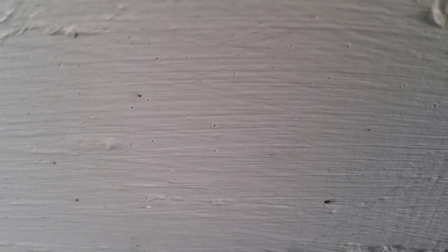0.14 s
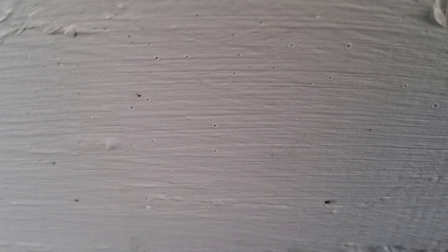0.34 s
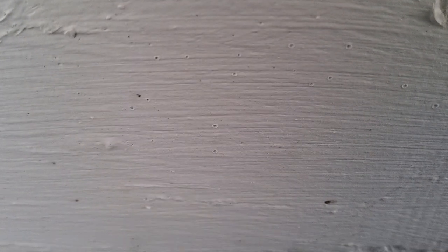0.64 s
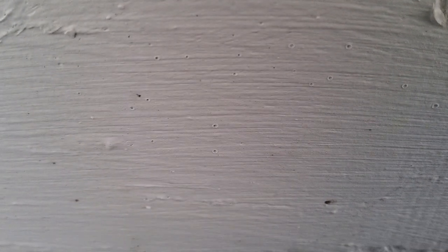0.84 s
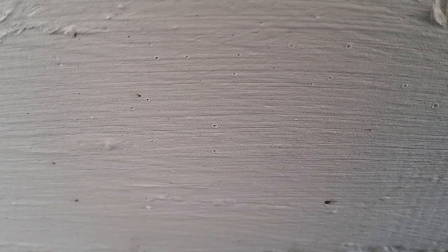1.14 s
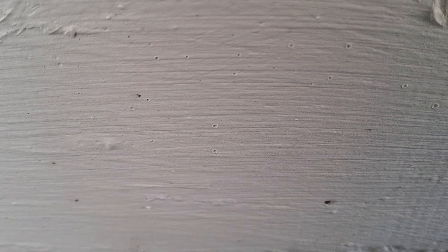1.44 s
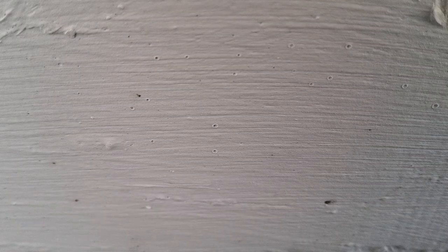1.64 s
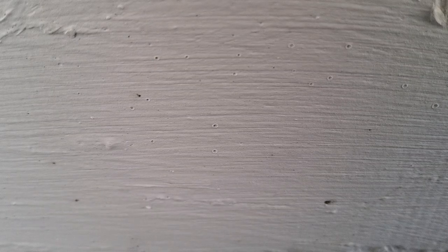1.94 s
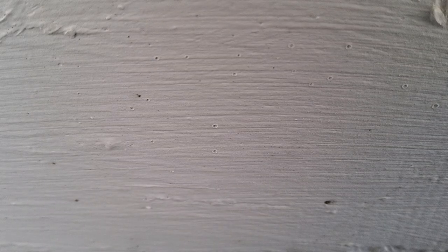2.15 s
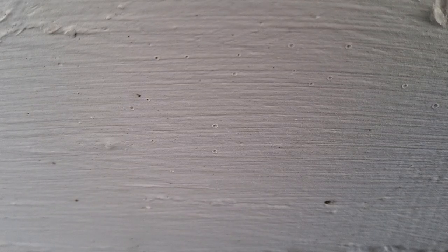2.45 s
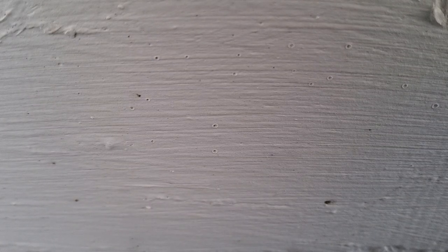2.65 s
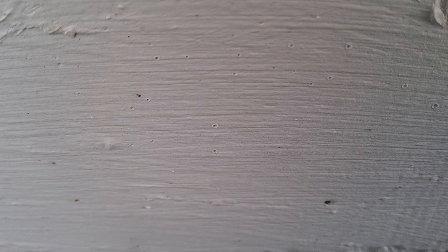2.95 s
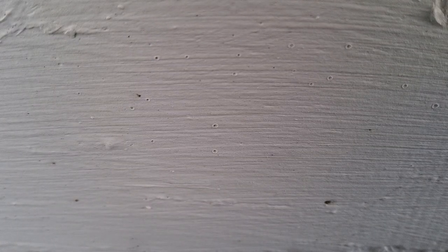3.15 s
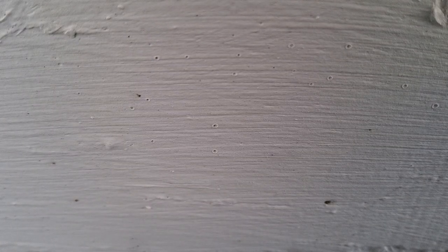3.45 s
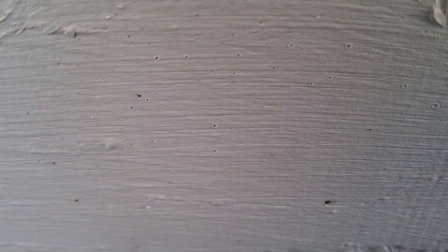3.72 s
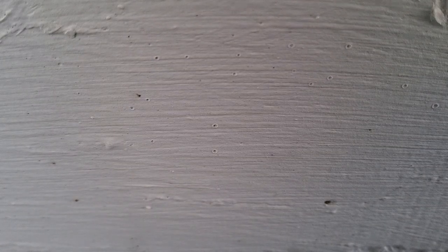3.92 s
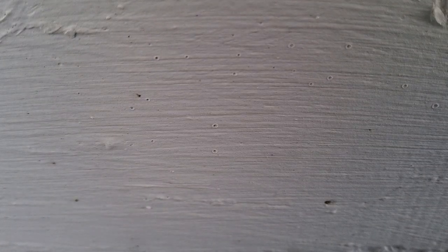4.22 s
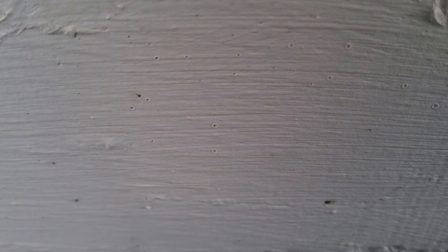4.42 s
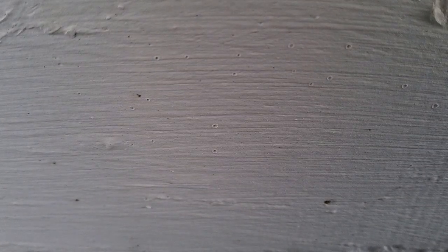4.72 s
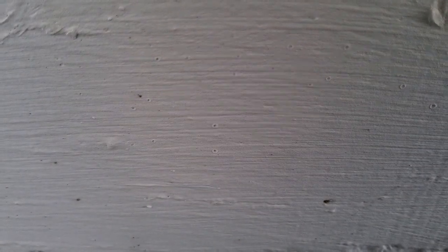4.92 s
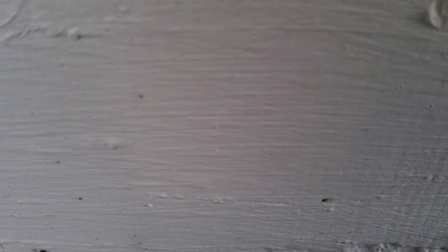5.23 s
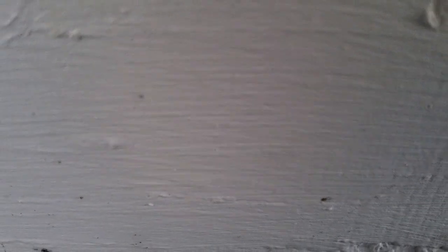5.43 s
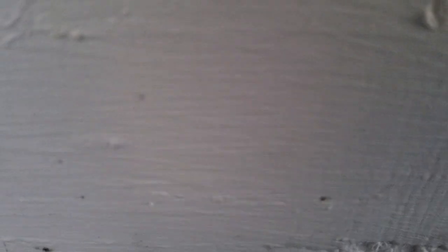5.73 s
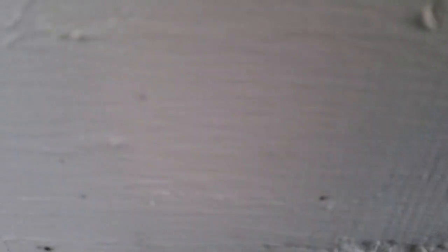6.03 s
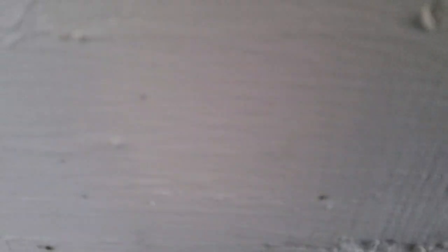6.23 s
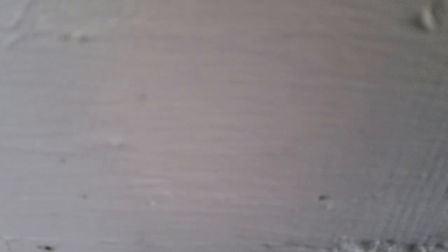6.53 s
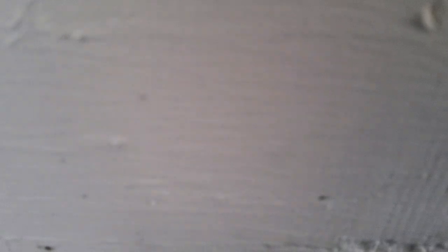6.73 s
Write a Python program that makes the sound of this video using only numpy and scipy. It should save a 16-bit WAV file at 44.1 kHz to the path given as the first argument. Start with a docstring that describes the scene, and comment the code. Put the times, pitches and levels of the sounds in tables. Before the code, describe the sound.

A small metal bell on a wooden mount is struck repeatedly, hard and soft, ringing with wavering beats and overloaded crackles, then fading amid light ticks.

```python
"""A small metal bell on a wooden mount, close to a two-microphone recorder, over a faint wavering rumble.
It is already ringing from a blow just before the start; further blows, hard and soft, follow up to 5.7 s.
Each blow feeds slightly mistuned twin modes that beat as they fade; hard ones overload the input and crackle.
Between and after the blows, until 6.4 s, light ticks ring the striker and knock the mount.
The input stage lifts the treble, clips it and lowers it again, which crunches the bass."""
import sys
import numpy as np
from scipy import signal
from scipy.fft import rfft, irfft
from scipy.io import wavfile
from scipy.ndimage import uniform_filter1d

SR = 44100
rng = np.random.default_rng(int(sys.argv[2]) if len(sys.argv) > 2 else 0)


def to_wav(sig):
    """Store sig (one row per channel, or 1-D mono) as 16-bit WAV at the path in sys.argv[1].

    Samples outside -1..1 are clipped; the rate is SR.
    """
    pcm = np.clip(np.atleast_2d(sig), -1, 1) * 32767
    pcm = np.round(pcm).astype(np.int16)
    wavfile.write(sys.argv[1], SR, pcm.T)  # frames by channels


N = 302967


def undb(db):
    """Decibels to gain."""
    return 10 ** (np.asarray(db) / 20)


def colour(x, points):
    """Shape the spectrum along (f/Hz, level/dB) points, then set the rms to 1."""
    hz, db = np.transpose(points)
    f = np.fft.rfftfreq(x.shape[-1], 1 / SR)
    gain = undb(np.interp(np.log(f + 1), np.log(hz), db))
    y = irfft(rfft(x) * gain, x.shape[-1])
    return y / np.sqrt(np.mean(y ** 2))


def wander(shape, size):
    """White noise averaged over a window of this many samples: a slow random drift."""
    return uniform_filter1d(rng.standard_normal(shape), size=size)


def add(out, s, sound):
    """Mix a sound in from time s, which may lie before the start."""
    i = int(s * SR)
    sound = sound[:, max(-i, 0):N - i]
    out[:, max(i, 0):max(i, 0) + sound.shape[1]] += sound


def rings(hz, t60, gain, length=1.2):
    """Sum of exponentially fading modes; gain is complex, channels x modes."""
    t = np.arange(int(length * SR)) / SR
    decay = np.log(1000) / t60
    return (gain @ np.exp(np.outer(2j * np.pi * hz - decay, t))).imag


# level of the background rumble: t/s, level/dB
RUMBLE_LEVEL = [(0.0, -67), (0.3, -67), (0.5, -50.5), (1.68, -65.5), (2.2, -61.5), (2.72, -58.5),
                (3.0, -71), (4.4, -68), (6.87, -63.5)]
# its spectrum: f/Hz, level/dB per Hz
RUMBLE_SPECTRUM = [(20, -25), (50, -5), (110, -10), (230, -12.5), (400, -29.5), (1000, -29), (4000, -43.5),
                   (16000, -54.5)]


def rumble():
    """Faint, mostly low noise, independent at each microphone, whose level wavers together in both."""
    s, db = np.transpose(RUMBLE_LEVEL)
    steps = np.repeat(rng.standard_normal(N // 3000 + 1), 3000)
    waver = uniform_filter1d(steps, size=3000)[:N]
    noise = colour(rng.standard_normal((2, N)), RUMBLE_SPECTRUM)
    microphone_db = np.array([[-1], [3]])  # left, right
    return noise * undb(np.interp(np.arange(N) / SR, s, db) + 1.3 * waver + microphone_db)


# spectrum of the spitting overload: f/Hz, level/dB per Hz
SPIT_SPECTRUM = [(30, -33), (90, -11), (230, 5), (800, -8), (2000, -1.5), (4000, -6), (8000, -14.5),
                 (16000, -39.5)]
# spectrum of the overload's bass: f/Hz, level/dB per Hz
THUMP_SPECTRUM = [(25, -38), (70, -1.5), (220, -2), (450, -13), (1500, -46)]
THUMP_DB, THUMP_LONGER = -5, 1.19  # bass level, and the factor by which it outlasts the spitting
LEFT_SHARE = .55  # length of the left crackle as a share of the right
SINK_DB, CHOKE_S = -5.5, 0.069  # the ring starts choked by SINK_DB; crackles shorter than CHOKE_S choke less


def crackle():
    """Overload: spitting noise with a sudden end, longer uneven bass, and the gain by which the ring sinks."""
    t = np.arange(N) / SR

    def gate(start, span):
        """Sudden start, then a steep fall around the end of the span."""
        past_end = (t - start - span) / (.06 * span)
        return (t >= start) / (1 + np.exp(np.clip(past_end, -40, 40)))

    loud, low, sink_db = np.zeros((3, 2, N))
    for start, *_, db, right_s in BLOWS:
        choke_db = SINK_DB * min(right_s / CHOKE_S, 1)
        for ear, length in enumerate((LEFT_SHARE * right_s, right_s)):
            done = np.clip((t - start) / length, 0, 1)
            loud[ear] += undb(db) * gate(start, length)
            low[ear] += undb(db) * gate(start, length * THUMP_LONGER)
            sink_db[ear] += choke_db * gate(start, length) * (1 - done)
    # the spitting flickers by about 5 dB, and all of the crackle more slowly by about 3 dB
    spit = rng.standard_normal((2, N)) * undb(3.6 * 11 * wander((2, N), 64))
    lumps = undb(3.0 * 22 * wander((2, N), 500))
    thump = colour(rng.standard_normal((2, N)), THUMP_SPECTRUM)
    thump = thump * uniform_filter1d(low, size=200) * undb(THUMP_DB)
    return lumps * (loud * colour(spit, SPIT_SPECTRUM) + thump), undb(sink_db)


# modes of the wooden mount: f/Hz, level/dB, t60/s
MOUNT_MODES = [(294, 0.5, 0.31), (337, -25.5, 0.5), (341, -17, 1), (440, -14.5, 0.39), (521, 5, 0.14),
               (710, -5.5, 0.05)]


def knock(db, chance):
    """The wooden mount thuds; the two microphones hear its modes differently."""
    hz, mode_db, t60 = np.transpose(MOUNT_MODES)
    ears = np.array([undb(-0.5) * np.exp(1.2j * chance[6:12]), np.ones(6)])
    gain = ears * undb(db + mode_db + 2.5 * chance[:6])
    thud = rings(hz * (1 + .02 * chance[34:]), t60, gain, .6)
    # the thud's level wavers at random, which roughens it
    thud = thud * (1 + .35 * 15 * wander(thud.shape, 225))
    # a soft push rather than a sharp one
    return thud * (1 - np.exp(-np.arange(thud.shape[1]) / SR / 0.0026))


# modes of the striker: f/Hz, level/dB, t60/s
STRIKER_MODES = [(4721, -19, 0.3), (5825, -6, 0.098), (7865, -17, 0.35), (8021, 0, 0.24), (8247, -15, 0.2),
                 (8845, -20, 0.18), (9808, -9, 0.16), (10460, -19, 0.22), (10690, -17, 0.19),
                 (10890, -15, 0.23), (11370, -19, 0.31), (11700, -24, 0.21), (12090, -18, 0.17),
                 (12440, -22, 0.29)]
# light contacts: t/s, striker level/dB, mount knock level/dB, rattle length/s
LIGHT_TICKS = [(.3262, -21, -37.5, .008), (.385, -36.5, -41.5, .004), (.719, -41, -55, .021),
               (.766, -43.5, -65, .025), (1.047, -62.5, -45, .005), (1.122, -60.5, -53, .004),
               (2.0105, -18, -36.5, 0.068), (2.372, -41, -40.5, .003), (2.618, -37, -52.5, .03),
               (2.735, -53, -49, .012), (2.803, -52.5, -55.5, .01), (2.914, -52, -67.5, .009),
               (3.382, -72, -60, .003), (3.6714, -29, -58, .036), (3.736, -40, -44.5, .02),
               (4.02, -47.5, -47.5, .006), (4.24, -36.5, -49, .03), (4.431, -60, -49.5, .003),
               (4.526, -61, -65, .004), (4.882, -46.5, -58, .01), (4.8913, -13.5, -44, .005),
               (5.1674, -38, -45, .003), (5.335, -37.5, -55.5, .004), (5.458, -62, -46, .003),
               (5.4874, -39.5, -51.5, .01), (5.633, -52, -42.5, .008), (5.763, -27.5, -51, .005),
               (6.168, -68, -55, .004), (6.4009, -38.5, -47, .008)]
TICK_LEFT_DB, HISS_DB, HISS_T60_S = -8.5, -6.5, .2  # left against right; the hiss of small modes
HARD_PER_DB, NEUTRAL_DB = 0.43, -46  # added dB per octave for each dB over the neutral strength
REBOUND_S, REBOUND_DB, REBOUND_RATTLE_S = .045, -16, 0.041  # chatter after each blow, against that blow's levels
HISS_SPECTRUM = [(500, -49.0), (1800, -9.5), (6000, 3.5),
                 (12000, -8.5), (14000, -23.0), (16000, -33.0)]  # f/Hz, level/dB


def ticks():
    """The striker chatters: its modes, a bright hiss of small modes, and a knock; stronger ticks are brighter."""
    hz, mode_db, t60 = np.transpose(STRIKER_MODES)
    left = undb(TICK_LEFT_DB) * np.exp(2j * np.pi * rng.random(len(hz)))
    ears = np.array([left, np.ones(len(hz))])
    t = np.arange(SR // 3) / SR
    out = np.zeros((2, N))
    rebounds = []
    for start, *_, quick_db, _, knock_db, _, _ in BLOWS:
        rebounds.append((start + REBOUND_S, quick_db + REBOUND_DB, knock_db + REBOUND_DB, REBOUND_RATTLE_S))
    for start, db, knock_db, rattle in LIGHT_TICKS + rebounds:
        hard = HARD_PER_DB * (db - NEUTRAL_DB)
        chance = rng.standard_normal(40)
        strength_db = mode_db + hard * np.log2(hz / 8000) + 4 * chance[12:12 + len(hz)]
        ring = rings(hz, t60, ears * undb(strength_db), 1 / 3)
        hiss = colour(rng.standard_normal((2, len(t))), HISS_SPECTRUM)
        # many small modes make its colour lumpy, and new at every contact
        hiss = colour(hiss, np.c_[np.geomspace(1500, 16000, 120), 8 * rng.standard_normal(120)])
        hiss_gain = undb(HISS_DB + np.array([[TICK_LEFT_DB], [0]]))
        hiss = hiss_gain * hiss * np.exp(-np.log(1000) * t / HISS_T60_S)
        # the hiss flickers by a few dB
        hiss = hiss * undb(2.5 * 20 * wander(len(t), 400))
        # a first contact, then sparse ones spread over the rattle
        touch = rng.standard_normal((1, len(t))) * (rng.random(len(t)) < .005) * (t < rattle)
        touch[0, 0] = 2.7
        touch = touch / np.sqrt(np.sum(touch ** 2))
        add(out, start, undb(db) * signal.fftconvolve(ring + hiss, touch, axes=1))
        add(out, start, knock(knock_db, chance))
    return out


# twin modes of the bell, each column pair for lower and upper twin: lower f/Hz, spacing/Hz, t60/s (two),
# left minus right level/dB (two), turns by which left leads (two)
BELL_TWINS = [(979.16, 1.69, 5.08, 5.38, -13.3, -2.9, -0.28, 0.01),
              (1921.77, 6.7, 0.86, 1.99, -11.9, -3.1, 0.08, -0.35),
              (2116.86, 2.23, 2.15, 2.46, -14.2, -15.3, 0.19, 0.23),
              (3276.4, 4.12, 0.86, 0.79, 0.7, -4.8, -0.45, -0.15),
              (4751.47, 1.39, 0.5, 0.64, -16.5, -10.8, 0.31, 0.37),
              (6440.95, 12.33, 0.49, 0.52, -13.6, -15.6, -0.43, -0.23),
              (4822.45, 11.67, 0.51, 0.46, 1.4, -6.3, -0.19, -0.09),
              (2883.92, 6.8, 0.75, 0.77, 3.9, -11.8, 0.05, 0.48),
              (4947.67, 1.01, 0.86, 0.53, -9.9, -11.3, -0.0, -0.27),
              (6137.61, 5.24, 0.31, 0.47, -10.1, -15.5, -0.25, -0.19),
              (8016.81, 4.06, 0.29, 0.31, -21.4, -14.8, 0.36, 0.2),
              (8322.09, 13.59, 0.39, 0.38, -34.6, -10.5, 0.41, 0.26),
              (10340.9, 7.88, 0.31, 0.33, -14.6, -10.7, -0.13, -0.33)]


def twin_modes():
    """Frequency, t60 and left and right pick-up of every twin, lower and upper side by side."""
    p = np.array(BELL_TWINS)
    hz = np.c_[p[:, 0], p[:, 0] + p[:, 1]]
    left = undb(p[:, 4:6]) * np.exp(2j * np.pi * p[:, 6:8])
    return hz, p[:, 2:4], np.array([left, np.ones_like(left)])


# strength of the quicker twin pairs, fifth to last: level/dB
QUICK_PAIR_DB = [1, 2, -7.5, -18.5, -15.5, -9.5, -16.5, -5.5, -3]
# unpaired treble modes of the bell: f/Hz, level/dB, t60/s
TREBLE_MODES = [(2480, -33.5, .38), (4290, -32, .5), (5500, -23, .3), (5850, -36, .64), (6837, -28, .45),
                (7386, -26.5, .24), (7865, -20.5, .41), (8650, -22, .3), (8899, -17, .18),
                (9860, -18.5, .1), (10005, -28, .23), (10890, -22, .28), (11300, -19, .28),
                (11440, -9, .087), (12540, -15, .28), (12870, -16.5, .13), (13210, -17, .13),
                (14200, -24, .25), (14620, -23, .22), (15590, -22, .2)]
# contacts on the rim: t/s, place/turns around the rim, long ring level/dB, its tilt/dB per octave,
# second pair's extra level/dB, earlier ring kept level/dB, quick ring level/dB, its hardness/dB per octave,
# mount knock level/dB, crackle level/dB, right crackle length/s
BLOWS = [(-.34997, .251, -11, 3.9, 2.2, 0, -22, -6, -45, -40, .05),
         (.46452, -.007, -9.6, 10, -4.6, 0, -5.5, 2.5, -25, -19, .085),
         (1.3289, .259, -29.5, -4.6, 1.7, -5.9, -48.5, -2, -35, -55, .008),
         (2.01006, .216, -53.4, -10.8, 32.4, 0, -60, .1, -45, -50, .04),
         (2.12128, .509, -4.9, 3.8, -10.1, 0, -5.5, 4.5, -26, -19.5, .091),
         (2.45418, .416, -15.3, 7.7, -4.1, -.5, -12.5, 2, -32.5, -18, .098),
         (3.67151, .513, -51.1, -16.7, 4.8, -7.5, -60, .1, -50, -55, .03),
         (3.83389, .508, -8.3, 4.2, -16, -1.2, -13, -13.5, -25, -22, .025),
         (4.09287, .555, -12.7, 4.1, -.2, 0, -8.5, 1.5, -31, -16.5, .1),
         (4.8929, .5, -60, 0, 0, 0, -55, 3, -40, -19, .016),
         (5.25486, .018, -17.8, 2.9, -3.2, 0, -24, 1.5, -27.5, -33.5, .02),
         (5.32446, -.102, -23.8, .3, -6.7, -2.8, -45.5, 9, -34, -38, .007),
         (5.74616, .039, -21.3, -6.2, 4.6, 0, -36, -15, -22, -33, .014)]
# the upper twins' share of a push swings twice around the rim: mean, swing, place of the peak/turns
UPPER_SHARE, UPPER_SWING, UPPER_PLACE = 0.53, .35, 0.017


def blows():
    """Each blow rings the quick pairs and the treble, tilted by its hardness, and knocks the mount."""
    hz, t60, ears = (v[..., 4:, :] for v in twin_modes())
    top_hz, top_db, top_t60 = np.transpose(TREBLE_MODES)
    top_left = undb(-12.0) * np.exp(2j * np.pi * rng.random(len(top_hz)))
    top_ears = np.array([top_left, np.ones(len(top_hz))])
    out = np.zeros((2, N))
    chances = rng.standard_normal((len(BLOWS), 40))
    for (start, place, *_, db, hard, knock_db, _, _), chance in zip(BLOWS, chances):
        swing = UPPER_SWING * np.cos(4 * np.pi * (place - UPPER_PLACE))
        angle = np.pi / 2 * np.clip(UPPER_SHARE + swing, 0, 1)
        share = np.array([np.cos(angle), np.sin(angle)])  # lower, upper
        pair_db = db + np.array(QUICK_PAIR_DB)[:, None] + hard * np.log2(hz / 5500)
        pairs = ears * share * undb(pair_db)
        single_db = db + top_db + hard * np.log2(top_hz / 5500) + 3.0 * chance[12:12 + len(top_hz)]
        add(out, start, rings(hz.ravel(), t60.ravel(), pairs.reshape(2, -1), 0.75))
        add(out, start, rings(top_hz, top_t60, top_ears * undb(single_db), .65))
        add(out, start, knock(knock_db, chance))
    return out


# shape of the four long-ringing pairs: waves around the rim, rotation of the pattern/turns,
# lead of the upper twin when struck/turns
LONG_SHAPE = [(2, -.032, .017), (1, -.205, .287), (3, .132, .227), (4, -.309, -.166)]
# strength of the same four pairs: level/dB
LONG_PAIR_DB = [-4.5, -0.8, 2.5, -2.5]


def long_ring():
    """The four long pairs: each push adds to what still rings, shared between twins by its place on the rim."""
    hz, t60, ears = (v[..., :4, :] for v in twin_modes())
    waves, rotated, lead = np.transpose(LONG_SHAPE)
    second_pair = np.arange(4) == 1
    out, before = np.zeros((2, N)), np.zeros((4, 2))
    ends = [row[0] for row in BLOWS[1:]] + [N / SR]
    for (start, place, db, tilt, second_db, kept_db, *_), end in zip(BLOWS, ends):
        angle = 2 * np.pi * (waves * place + rotated)
        size_db = db + np.array(LONG_PAIR_DB) + tilt * np.log2(hz[:, 0] / 2000) + second_db * second_pair
        twins = np.c_[np.cos(angle), np.sin(angle) * np.exp(2j * np.pi * lead)]
        state = before * undb(kept_db) + undb(size_db)[:, None] * twins
        count = int(end * SR) - int(start * SR)
        gain = (ears * state).reshape(2, -1)
        add(out, start, rings(hz.ravel(), t60.ravel(), gain, (count + .5) / SR))
        # carry phase and decay on to the next contact
        before = state * np.exp((2j * np.pi * hz - np.log(1000) / t60) * count / SR)
    return out


def scene():
    """Rumble, crackle and ticks around the bell, whose ring sinks while the input crackles."""
    noise, sink = crackle()
    return rumble() + noise + ticks() + (blows() + long_ring()) * sink


LIFT_HZ, CLIP_DB = (1556, 13700), (15, 14.5)  # treble lift between these corners; clip level left, right
HOLD_DB, LOW_HZ, TOP_HZ = -3.5, 51.4, 16300


def record(dry):
    """The lifted treble clips and is lowered again, so difference tones of the modes crunch in the bass."""
    zero, pole = np.exp(-2 * np.pi * np.array(LIFT_HZ) / SR)
    flat = np.poly([pole, pole]) / (1 - pole) ** 2
    steep = np.poly([zero, zero]) / (1 - zero) ** 2
    top = undb(CLIP_DB)[:, None]
    lifted = signal.lfilter(steep, flat, dry)
    level = uniform_filter1d(np.abs(lifted), size=300, axis=1) + 1e-9
    held = lifted * np.minimum(1, undb(HOLD_DB) * top / level)
    clipped = np.clip(held, -top, top)
    lowered = signal.lfilter(flat, steep, clipped)
    heard = signal.sosfilt(signal.butter(2, LOW_HZ, "high", fs=SR, output="sos"), lowered)
    # soft limit at full scale
    rounded = heard / (1 + np.abs(heard) ** 6) ** (1 / 6)
    return signal.sosfilt(signal.ellip(12, .2, 90, TOP_HZ, fs=SR, output="sos"), rounded)


dry = scene()
out = record(dry)
to_wav(out)
```